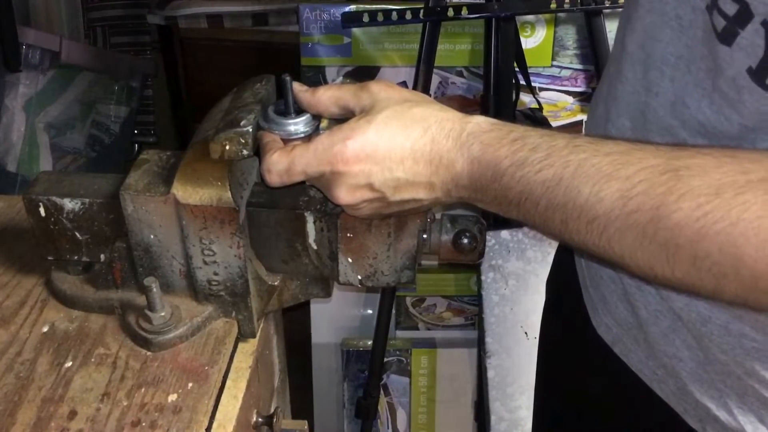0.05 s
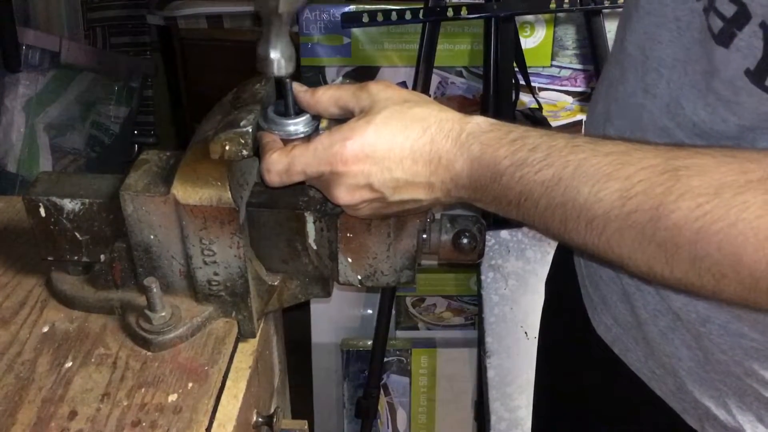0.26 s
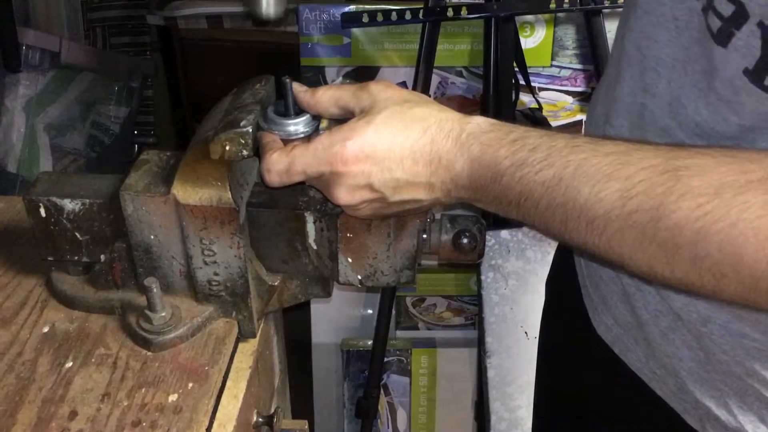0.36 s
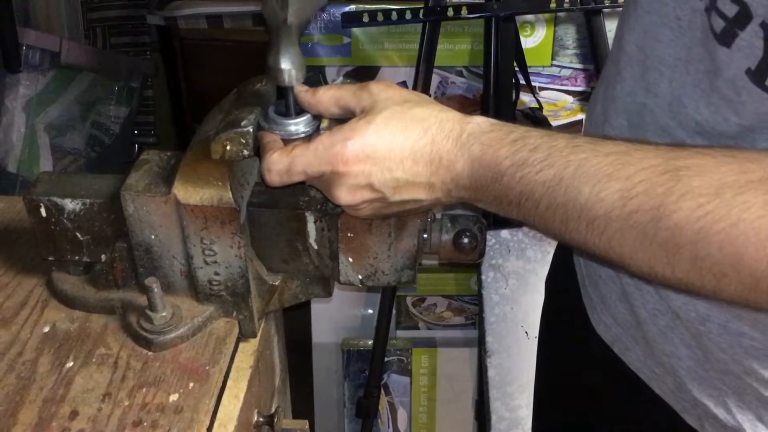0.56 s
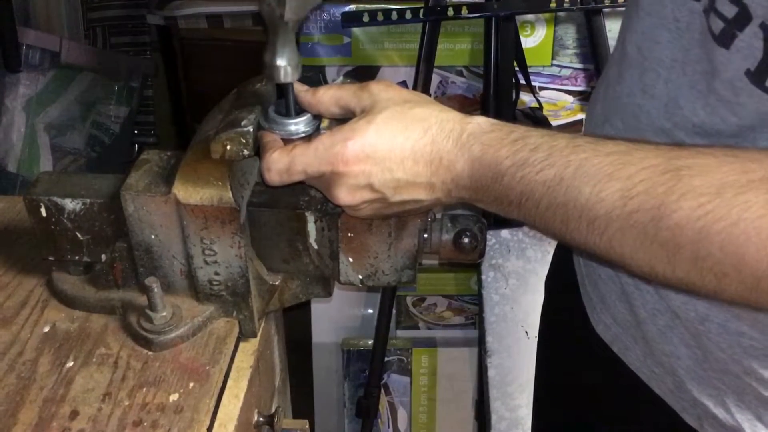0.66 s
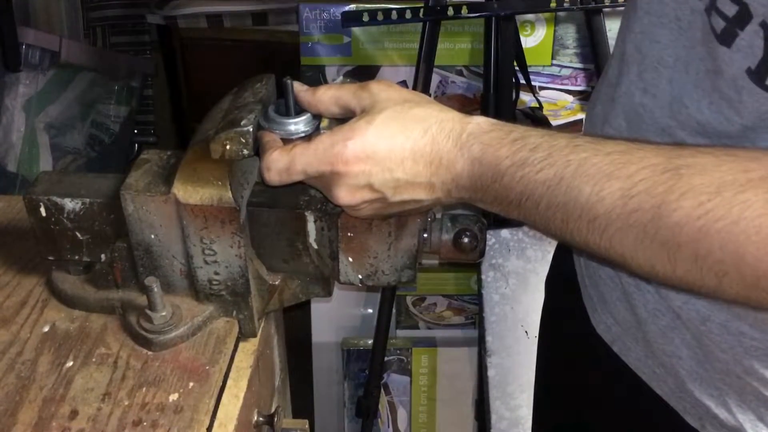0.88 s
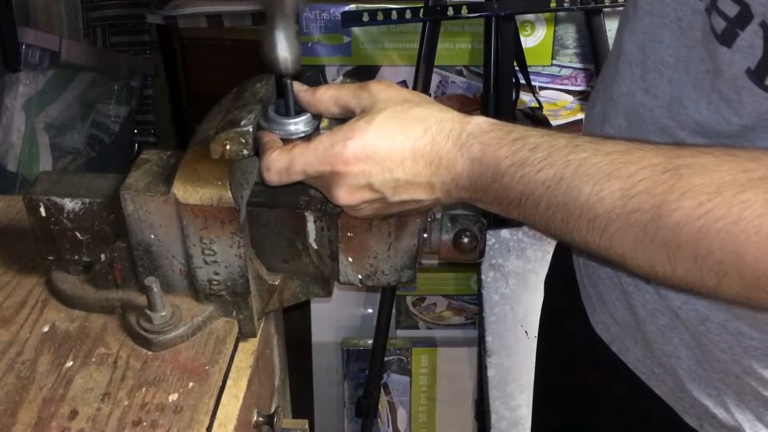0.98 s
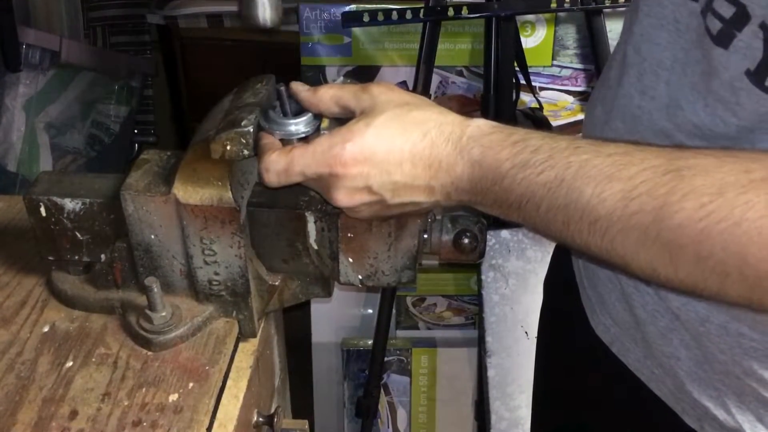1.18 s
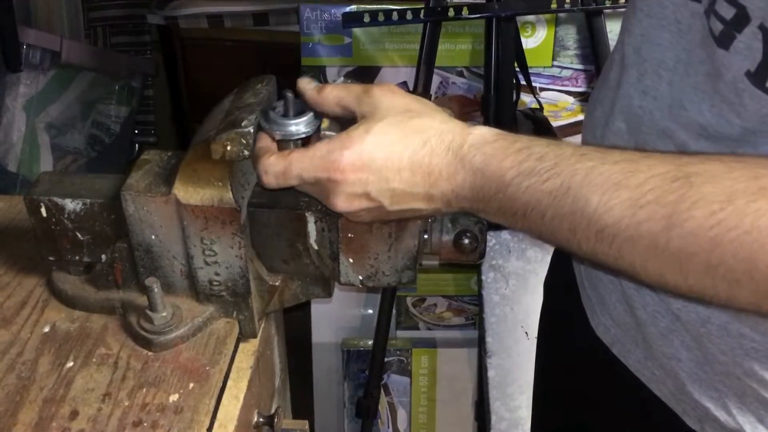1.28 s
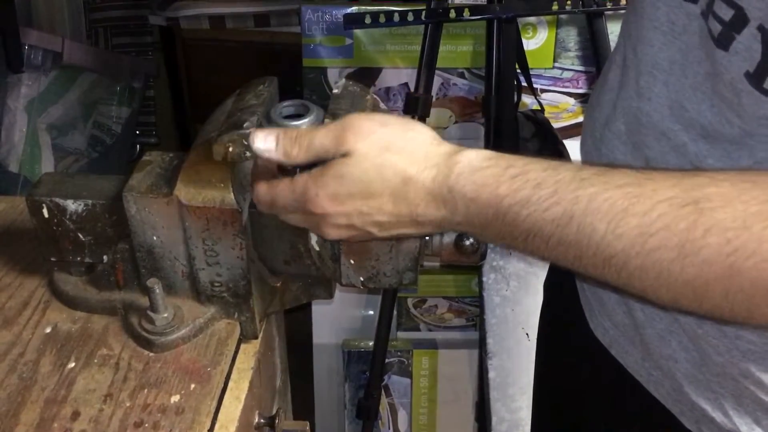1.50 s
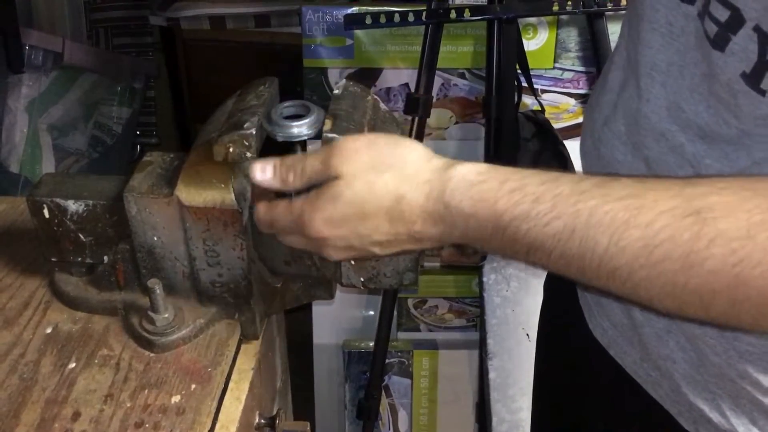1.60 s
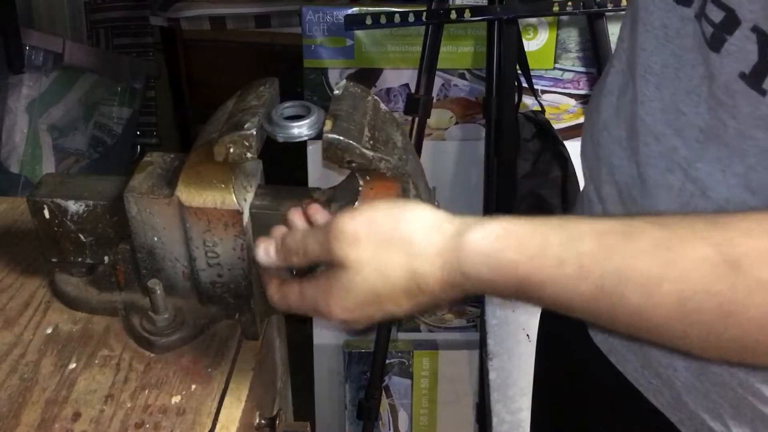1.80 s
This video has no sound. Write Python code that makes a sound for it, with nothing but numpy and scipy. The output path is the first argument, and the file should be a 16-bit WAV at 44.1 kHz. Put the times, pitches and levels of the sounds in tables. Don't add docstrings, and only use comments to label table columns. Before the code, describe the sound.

A hammer strikes a steel bush held in a vice, three bright cracking taps evenly spaced, then the bush slips and a loose collar drops, clinks rapidly and skids to rest in a small hard workshop, close microphone.

```python
import sys
import numpy as np
from scipy import signal
from scipy.fft import rfft, irfft
from scipy.io import wavfile
from scipy.ndimage import uniform_filter1d

SR = 44100
rng = np.random.default_rng(int(sys.argv[2]) if len(sys.argv) > 2 else 0)


def log_audio(samples):
    frames = np.atleast_2d(samples).T
    limited = np.clip(frames, -1, 1)
    pcm = np.round(limited * 32767).astype(np.int16)
    wavfile.write(sys.argv[1], SR, pcm)


def attenuation_scalar(level_db):
    decades = np.asarray(level_db, float) / 20
    return 10 ** decades


N = 81585
LEAD = SR // 4


def evened(x):
    return x / np.sqrt(np.mean(x ** 2) + 1e-20)


def read(points, hz):
    f, value = np.transpose(points)
    return np.interp(np.log(hz + 1), np.log(f + 1), value)


def tilted(points, tilt_db):
    return [(hz, db + tilt_db * np.log2(hz / 5000)) for hz, db in points]


def add(mix, s, sound):
    part = mix[round(s * SR) + LEAD:][:len(sound)]
    part += sound[:len(part)]


def coloured(x, points):
    n = np.arange(len(x))
    log_gain = read(points, np.fft.rfftfreq(len(x), 1 / SR)) * np.log(10) / 20
    cepstrum = irfft(log_gain, len(x))
    cepstrum = cepstrum * np.where(n < len(x) // 2, 2, 0) / (1 + (n == 0))
    return irfft(rfft(x) * np.exp(rfft(cepstrum)), len(x))


def ring(modes, share=1, tilt_db=0, spot_db=0, shift=0, count=16384):
    contact_s = .0004
    hz, db, t60 = np.transpose(modes)[:, :, None]
    luck = rng.standard_normal((2, len(modes), 1))
    t = np.arange(count) / SR
    level = db + tilt_db * np.log2(hz / 5000) + spot_db * luck[0]
    level = level - 60 * t / (t60 * max(share, .05))
    waves = np.sin(2 * np.pi * hz * (1 + shift * luck[1]) * t)
    onset = 1 - np.exp(-(t / contact_s) ** 2)
    return onset * (attenuation_scalar(level) * waves).sum(0)


def burst(points, db, t60, count=4096):
    fade = attenuation_scalar(-60 * np.arange(count) / SR / t60)
    puff = coloured(rng.standard_normal(count) * fade, points)
    return attenuation_scalar(db) * puff * np.linalg.norm(fade) / np.linalg.norm(puff)


# (time [s], strength [dB], bench shake [dB], brightness [dB/octave], ring length share [1])
HAMMER_TAPS = [
    (-.205, -4, -46, 0, 2.7),
    (0.22, 0.5, -39, 2, 0.93),
    (0.6418, 2.5, -38.5, 0, 0.77),
    (1.0754, 3, -49, -1, 0.34),
    (1.1461, -14, -60, -3, 0.94),
    (1.1625, -25.5, -69, 1, 0.56),
]
# (frequency [Hz], level [dB], t60 [s])
BUSH_MODES = [(1900, -46, .03), (2660, -20.5, 0.1), (3770, -17, 0.07), (3813, -1, 0.021),
              (4562, 1.5, 0.032), (4770, -25.5, 0.036), (4800, -19, .03), (5000, 8, .035),
              (5492, -5.5, 0.059), (5860, -13.5, 0.035), (6020, -20, 0.022), (7155, -8.5, 0.057),
              (8050, -30.5, 0.1)]
# (frequency [Hz], level [dB per Hz])
CRACK_COLOUR = [(300, -57.5), (1000, -41.5), (2000, -21.5), (3200, -29), (4300, -11.5), (5800, 0),
                (8800, -18), (16000, -20)]
# (frequency [Hz], level [dB], t60 [s])
JAW_MODES = [(1342, -7, 0.028), (1180, -15, .014), (1520, -20, 0.01)]
# (frequency [Hz], level [dB])
FAR_COLOUR = [(500, -43.5), (1500, -18), (2400, -23), (3600, -11.5), (4700, -2), (5900, -1), (8400, -17.5),
              (16000, -25.5)]


def hammer():
    seat_s, seat_db = .0011, 9
    blows, knocks, far = np.zeros((3, N + LEAD))
    click = np.arange(2048) == 0
    for s, db, _, tilt_db, share in HAMMER_TAPS:
        bush = ring(BUSH_MODES, share, tilt_db, spot_db=1.5, shift=.006, count=4096)
        crack = burst(tilted(CRACK_COLOUR, tilt_db), 7, 0.0095 * share)
        blow = attenuation_scalar(db - 14) * (bush + crack)
        add(blows, s, attenuation_scalar(-seat_db) * blow)
        add(blows, s + seat_s, blow)
        add(knocks, s, attenuation_scalar(db - 16.5 + 2.14 * tilt_db) * ring(JAW_MODES, count=4096))
        colour = [(hz, v + 1.5 * rng.standard_normal()) for hz, v in tilted(FAR_COLOUR, tilt_db)]
        add(far, s + seat_s, attenuation_scalar(db + 16) * coloured(click, colour))
    return blows, knocks, far


# (frequency [Hz], level [dB], t60 [s])
BENCH_MODES = [(63.6, -4, 0.45), (107, -4.5, 0.05), (177, 1, 0.043), (256.5, -2, 0.12), (368, 0.5, 0.023)]
# (time [s], level [dB], frequency [Hz], t60 [s])
BENCH_BUMPS = [
    (1.391, -28, 162.5, 0.062),
    (1.789, -53, 45, 0.1),
]


def bench():
    rise_s = 0.059
    out, t = np.zeros(N + LEAD), np.arange(16384) / SR
    for s, _, db, _, _ in HAMMER_TAPS:
        push = rng.standard_normal(len(t)) * t * np.exp(-t / (rise_s / 2))
        sway = signal.fftconvolve(push, ring(BENCH_MODES))[:len(t)]
        add(out, s, attenuation_scalar(db) * sway / abs(sway).max() * 2)
    for s, db, hz, t60 in BENCH_BUMPS:
        thud = ring([(hz, db, t60), (hz * 1.29, db + 2.5, t60 * 0.41)])
        add(out, s, np.minimum(t / 0.0049, 1) * thud)
    return out


# (delay [s], level [dB])
NEAR_ECHOES = [(.0023, -2.5), (.0057, -1), (.0088, -5.5), (.0115, -11)]
# (frequency [Hz], t60 [s])
ROOM_DECAY = [(200, 0.86), (1000, 0.4), (2500, 0.47), (5000, 0.36), (8000, 0.34), (12000, 0.23),
              (16000, 0.12)]


def room(x, far, echo_db=0):
    start_s, early_db, early_t60 = .006, 8.5, 0.034
    t = np.arange(SR) / SR
    taps = np.zeros(SR)
    at = np.arange(0, SR - 20, 20)
    taps[at + rng.integers(0, 20, len(at))] = rng.choice([-1., 1.], len(at))
    hz, frame_s, z = signal.stft(taps, SR, nperseg=256)
    z = z * attenuation_scalar(-60 * frame_s / read(ROOM_DECAY, hz)[:, None])
    tail = signal.istft(z, SR, nperseg=256)[1][:SR]
    tail = tail * np.clip(t / start_s - .5, 0, 1) * (1 + attenuation_scalar(early_db - 60 * t / early_t60))
    tail = tail / np.linalg.norm(tail)
    near = np.zeros(SR // 10)
    for k, (s, db) in enumerate(NEAR_ECHOES):
        near[round(s * SR)] += attenuation_scalar(db + echo_db) * (-1) ** k
    near = signal.lfilter(*signal.butter(1, 9550, fs=SR), near)
    return x + signal.fftconvolve(x, near)[:len(x)] + signal.fftconvolve(far, tail)[:len(x)]


# (frequency [Hz], level [dB per Hz])
AIR_COLOUR = [(20, -9.5), (60, 2.5), (250, -3.5), (500, -9), (1800, -17.5), (5000, -22.5), (10000, -29),
              (16000, -29)]
# (frequency [Hz], width [Hz], level [dB])
HUMS = [(2794, 120, -73.5), (2500, 360, -76), (3140, 70, -79), (1878, 50, -81.5), (6800, 200, -82),
        (230.7, 43, -72.5)]


def air():
    patch_db, lump_db, lump_hz = 3, 1, 144
    hz = np.fft.rfftfreq(1024, 1 / SR)[:, None]
    a, b, patch = rng.standard_normal((N // 256 + 8, 513, 3)).T
    patch = uniform_filter1d(patch, size=8, axis=0)
    patch = evened(uniform_filter1d(patch, size=6, axis=1))
    wobble_db = (patch_db + lump_db / (1 + (hz / lump_hz) ** 2)) * patch
    z = (a + 1j * b) * attenuation_scalar(read(AIR_COLOUR, hz) + wobble_db)
    out = attenuation_scalar(-57.5) * evened(signal.istft(z, nperseg=1024, noverlap=768)[1][:N])
    fine = np.fft.rfftfreq(N, 1 / SR)
    for hum_hz, width_hz, db in HUMS:
        band = 1 / (1 + (2 * (fine - hum_hz) / width_hz) ** 2)
        hum = irfft(rfft(rng.standard_normal(N)) * band, N)
        out = out + attenuation_scalar(db) * evened(hum)
    return out


# (time [s], strength [dB], free ring [s], lower rim mode [dB], upper rim mode [dB])
COLLAR_CLINKS = [(1.3808, -14, 0.00083, -51, -52), (1.3836, -16.5, 0.00071, -49, -55),
                 (1.3892, -18.5, 0.011, -58, -68), (1.406, -20.5, 0.017, -59, -59),
                 (1.4235, -31, .008, -70, -58.5), (1.4349, -20.5, 0.039, -73, -64.5),
                 (1.4509, -21, 0.011, -74, -54), (1.4706, -16, 0.017, -78, -67),
                 (1.4942, -22.5, 0.0024, -65, -49), (1.5045, -19, 0.019, -67, -47),
                 (1.5158, -17.5, 0.018, -70, -46), (1.5278, -20.5, 0.022, -56, -62),
                 (1.5386, -17, 0.02, -68, -47), (1.5886, -18.5, .014, -50.5, -54)]
# (frequency [Hz], level [dB], t60 [s])
COLLAR_MODES = [(1400, -36, 0.06), (1980, -25.5, 0.11), (2151, -32.5, 0.19), (2624, -30.5, 0.1),
                (3050, -27.5, .05), (3723, -16, 0.13), (4100, -21.5, 0.065), (6040, -16.5, .03),
                (6360, -27.5, .05)]
# (frequency [Hz], level [dB], t60 [s])
STRONGEST_MODE = (5073, 0, .16)
# (frequency [Hz], level [dB], t60 [s])
SHORT_MODES = [(4830, -15, .03), (5240, -17, .04), (5560, -14, .02)]
RIM_MODES = 12550, 14450, 13950
RIM_DECAY = (0.097, 0.024, .04)
# (frequency [Hz], level [dB per Hz])
TICK_COLOUR = [(900, -31), (2000, -13.5), (3700, -6.5), (5200, 0), (6600, -6), (7600, -20.5),
               (11000, -31.5), (16000, -40)]
# (time [s], level [dB])
SKID_LEVEL = [(1.385, -42), (1.4, -39.5), (1.43, -37.5), (1.49, -43), (1.535, -30), (1.57, -53),
              (1.615, -44), (1.646, -41), (1.66, -85)]


def collar():
    choke_db_per_s, skid_per_s = 1508, 1200
    out, t = np.zeros(N + LEAD), np.arange(16384) / SR
    modes = [*COLLAR_MODES, *SHORT_MODES, STRONGEST_MODE]
    for s, db, hold_s, low_db, high_db in COLLAR_CLINKS:
        choke = attenuation_scalar(-choke_db_per_s * np.maximum(t - hold_s, 0))
        rim = list(zip(RIM_MODES, (low_db, high_db, high_db - 7), RIM_DECAY))
        body = attenuation_scalar(db - 2) * choke * ring(modes, spot_db=1.2)
        add(out, s, body + ring(rim))
        add(out, s, burst(TICK_COLOUR, db - 11, .016))
    grains = (rng.random(N) < skid_per_s / SR) * rng.standard_normal(N)
    grains = grains * attenuation_scalar(np.interp(np.arange(N) / SR, *np.transpose(SKID_LEVEL), -120, -120))
    skid_ring = ring([*modes, (RIM_MODES[0], -32, RIM_DECAY[0])], share=.7)
    add(out, 0, signal.fftconvolve(grains, skid_ring)[:N])
    return out


def scene():
    blows, knocks, far = hammer()
    loose = collar()
    tail_feed = far + attenuation_scalar(-17) * blows + attenuation_scalar(-14) * knocks
    hammered = room(blows, tail_feed) + knocks
    dropped = room(loose, attenuation_scalar(-15) * loose, echo_db=-11)
    metal = hammered + dropped + bench()
    return (metal[LEAD:] + air())[None]


def band_limit(x):
    return signal.sosfilt(signal.butter(12, 17010, fs=SR, output="sos"), x)


def record(dry):
    peak = .8
    limited = peak * np.tanh(dry / peak)
    edge = signal.cheby2(14, 60, 17000, fs=SR, output="sos")
    return band_limit(signal.sosfilt(edge, limited))


dry = scene()
out = record(dry)
log_audio(out)
```